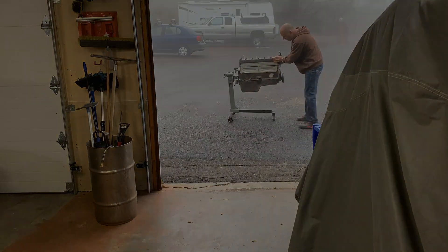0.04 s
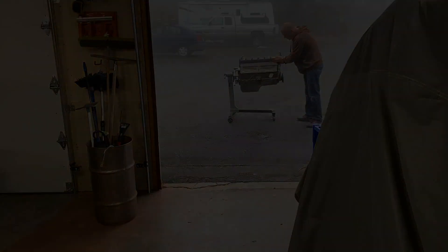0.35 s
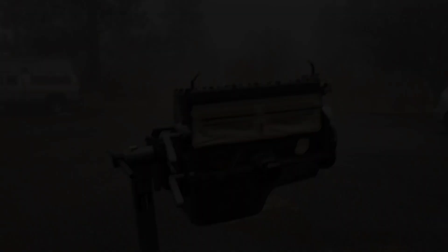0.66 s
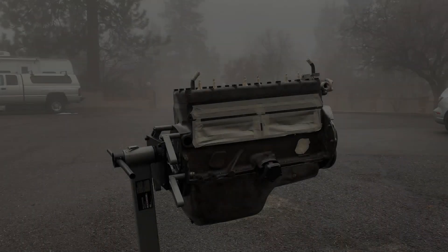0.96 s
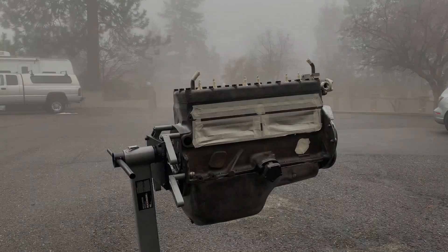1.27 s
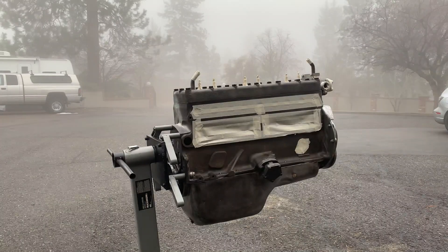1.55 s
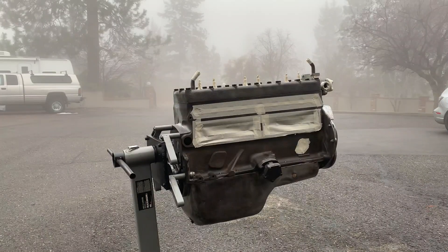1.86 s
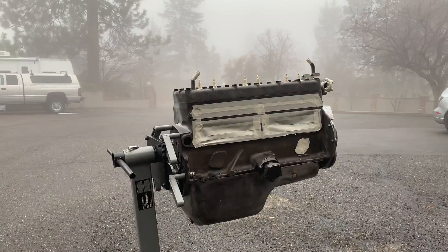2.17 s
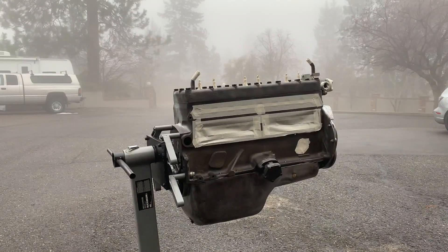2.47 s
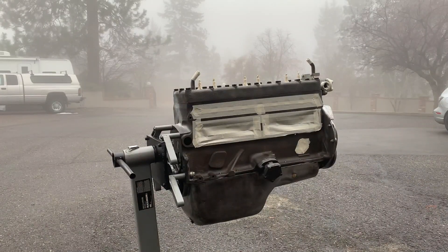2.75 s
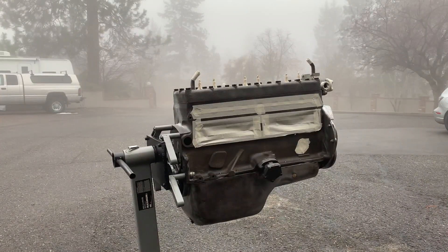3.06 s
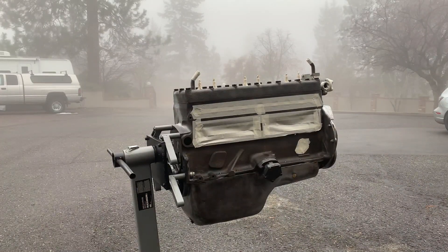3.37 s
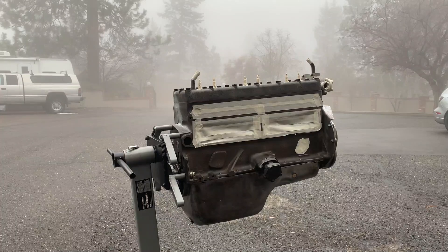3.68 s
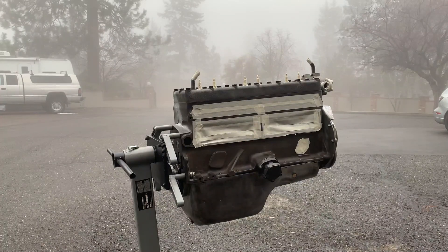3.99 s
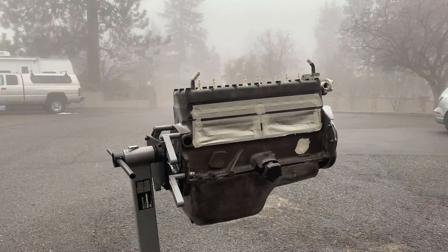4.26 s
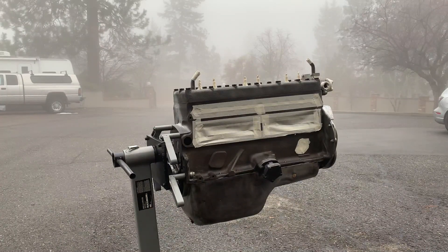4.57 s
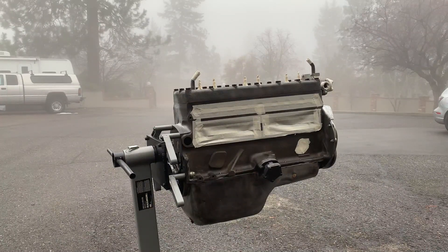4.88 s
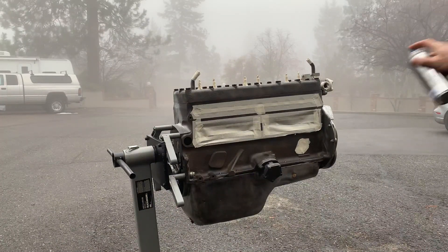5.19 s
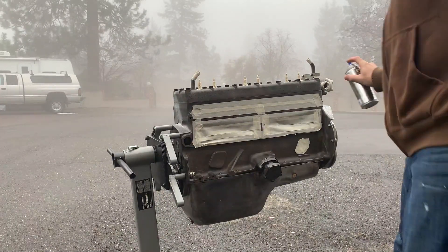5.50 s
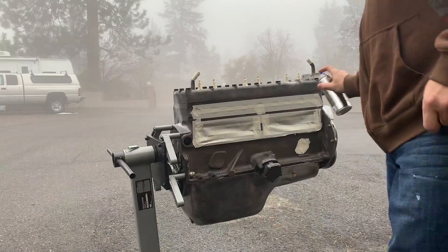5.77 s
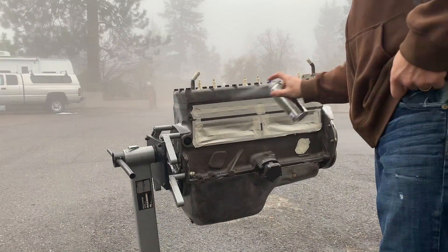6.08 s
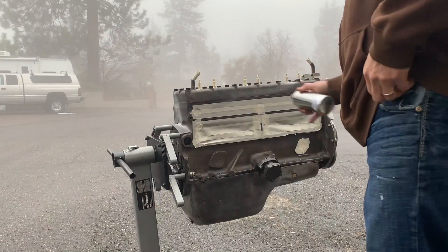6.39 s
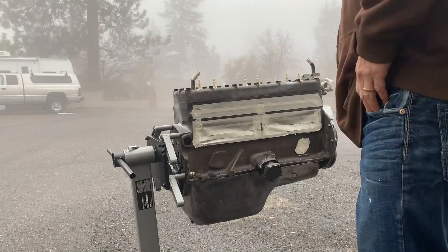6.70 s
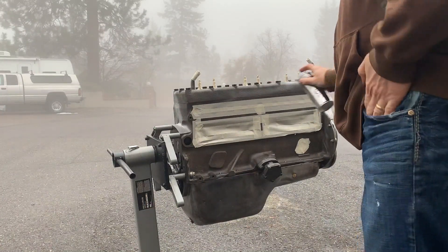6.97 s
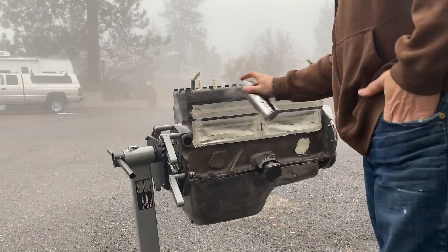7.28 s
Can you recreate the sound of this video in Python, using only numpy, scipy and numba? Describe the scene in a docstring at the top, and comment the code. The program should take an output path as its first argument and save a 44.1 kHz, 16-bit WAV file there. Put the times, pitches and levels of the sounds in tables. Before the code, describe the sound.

At the start, a loaded engine stand clatters over asphalt, heard from inside a garage: casters knock and the steel frame rings, fading to silence by about 0.6 seconds. From 0.7 seconds an outdoor scene fades in with a faint low rumble. From about 1 second a spray paint can is shaken to the right, its ball clacking sharply on the thin metal walls while the paint sloshes softly. The rattle is loudest and busiest between 2.3 and 3.9 seconds, then thins to a few weak taps. Between 5 and 5.6 seconds the can, now in front, gives several more clacks and a small slosh. Soft shoe thuds come now and then. A bright spray hiss runs from 5.7 to 6.3 seconds, followed by a couple of faint ticks. A second burst starts at 6.8 seconds and swells until the end, around 7.5 seconds.

```python
"""An aerosol can is shaken outdoors, to the right: its ball clacks on the thin walls, its paint sloshes.
Carried to the front, it sprays two long bursts of turbulent hiss, each building up.
Before that, a loaded engine stand clatters over asphalt, heard from a garage: casters knock, steel rings.
The stand fades out and the outdoor scene fades in, with soft shoe thuds and a low rumble behind the can."""
import sys
import numpy as np
from scipy import signal
from scipy.fft import rfft, irfft
from scipy.io import wavfile
from scipy.ndimage import map_coordinates
from numba import njit

SR = 44100
rng = np.random.default_rng(int(sys.argv[2]) if len(sys.argv) > 2 else 0)


def file_out(sig):
    """Save sig as 16-bit WAV at sys.argv[1]."""
    # one column per channel
    cols = np.atleast_2d(sig).T
    # limit, then scale
    lim = np.clip(cols, -1, 1)
    pcm = np.round(lim * 32767).astype(np.int16)
    wavfile.write(sys.argv[1], SR, pcm)


N = 328104
TIME_S = np.arange(N) / SR

# Ball hits on the can wall (main strikes, off-beat taps, strong rebounds), each followed by small bounces:
# (time [s], relative level [dB], spot ring [Hz], tilt [dB/octave], hollow knock [dB],
# first flight [s], relative level of first bounce [dB])
BALL_HITS = [(0.982, -37.5, 1725, -1, -17.5, 0.039, -41), (1.1994, -42, 2200, -2.5, -17.5, 0.018, -42.5),
             (1.264, -32, 3420, -2, -13, 0.03, -31.5), (1.335, -30.5, 2180, -2, -20, 0.0025, -54),
             (1.4431, -22, 2900, -3, -10.5, 0.018, -26.5), (1.4925, -20, 1395, -4.5, -4.5, 0.013, -27),
             (1.541, -20.5, 1687, -4, -14.5, 0.023, -30), (1.553, -20, 5000, 2.5, -19, 0.026, -30),
             (1.568, -21.5, 3000, -8.5, -15, 0.017, -29.5), (1.645, -38.5, 2000, -4, -5.5, 0.0033, -38),
             (1.95, -22.5, 3900, 2, -0.5, 0.004, -26.5), (2.0139, -25, 1480, -5, -10.5, 0.01, -25.5),
             (2.078, -21.5, 2150, 0, -8, 0.017, -26.5), (2.1164, -29, 1960, 4.5, -1.5, 0.015, -29.5),
             (2.2849, -16.5, 3660, -2, -18, 0.004, -15.5), (2.3429, -28.5, 5100, -1, -19.5, 0.025, -35.5),
             (2.3847, -16, 3840, -2.5, -11, 0.042, -31.5), (2.4659, -10, 3400, 1, -24.5, 0.005, -30),
             (2.4826, -11.5, 4600, 3.5, -21, 0.0048, -24.5), (2.519, -16, 6100, 0, -21.5, 0.038, -28),
             (2.6082, -23, 1800, 4, -0.5, 0.042, -21.5), (2.6131, -13, 4400, -3, -14, 0.04, -29),
             (2.6898, -12.5, 3320, 1, -19.5, 0.0079, -31), (2.7019, -11.5, 3940, 3.5, -24.5, 0.0062, -26.5),
             (2.7124, -15.5, 3930, 4.5, -21.5, 0.013, -27), (2.8207, -13, 6000, -1, -19.5, 0.018, -22.5),
             (2.9071, -15.5, 2000, 1.5, -16, 0.0061, -15), (3.0018, -11, 2400, 0.5, -12, 0.021, -17.5),
             (3.112, -14, 2240, 0.5, -16.5, 0.019, -16.5), (3.1336, -15.5, 2500, 2, -14.5, 0.011, -29),
             (3.183, -8, 4000, -1.5, -10, 0.038, -30.5), (3.227, -16.5, 1580, -2, -21, 0.0076, -21.5),
             (3.297, -12.5, 2340, -1, -18, 0.011, -17), (3.3119, -16, 2600, 6.5, -19, 0.0033, -23),
             (3.3342, -18, 6740, 4.5, -17, 0.013, -24), (3.3886, -11, 2180, 2.5, -13.5, 0.051, -25),
             (3.467, -24, 1900, -4.5, -14.5, 0.01, -41.5), (3.5131, -11, 3060, 1, -22.5, 0.033, -21.5),
             (3.566, -25.5, 2190, 5.5, -17, .0135, -30), (3.6337, -13, 2320, .5, -19, 0.022, -23.5),
             (3.737, -27.5, 1870, -3, -9.5, 0.0041, -36), (3.7601, -16.5, 2340, 3, -20, 0.0065, -15.5),
             (3.882, -17.5, 2100, -0.5, -9.5, 0.0048, -31), (3.918, -32, 2470, 1.5, 0, 0.046, -45),
             (4.052, -35, 2310, 2.5, 5, 0.03, -38), (4.2085, -33.5, 2950, -7.5, -14, 0.077, -45),
             (4.3509, -43.5, 2600, -3.5, -13.5, 0.098, -42.5), (4.6768, -45, 2950, -3, -16.5, 0.038, -58),
             (5.0627, -16.5, 3420, -2, -18.5, 0.013, -17), (5.1134, -29.5, 1630, -1, -9.5, 0.038, -30),
             (5.1934, -27, 2185, 1.5, 4, 0.0041, -20.5), (5.334, -38.5, 1710, 1, -1, 0.0075, -60),
             (5.404, -22.5, 5000, 3.5, -8.5, 0.066, -42), (5.5172, -34.5, 1700, -0.5, -3, 0.0043, -34.5),
             (5.5816, -32.5, 1800, -0.5, -3.5, 0.041, -36.5), (6.442, -42, 2130, -2, -14, 0.053, -39.5),
             (6.691, -47.5, 2500, 2, -15, 0.052, -54)]
# Clack spectrum: (frequency [Hz], level [dB])
CLACK_SPECTRUM = [(200, -27.5), (550, -20.5), (900, -8.5), (1600, 1.5), (2600, -2.5), (3900, 1),
                  (6300, -3.5), (8000, -8.5), (10000, -10), (15000, -19)]
# Can wall modes: (frequency [Hz], level [dB], t60 [s])
WALL_MODES = [(1697, -3, 0.072), (2380, -15, 0.043), (2340, 16.5, 0.019), (2563, -6, 0.09),
              (3260, -29, .03), (3600, 2, 0.039), (4350, 9.5, 0.012), (4824, 16.5, 0.012), (4700, 3, 0.031),
              (5950, -9, 0.0069), (8100, -18, .02)]
# Whole-can flex on a square hit: (frequency [Hz], level [dB], t60 [s])
FLEX_MODES = [(433, -18, 0.011), (860, 0.5, 0.012), (1150, -5.5, 0.015), (1368, 4, 0.0096)]
# Ball skids: (time [s], level [dB], centre [Hz], length [s], top treble [dB])
BALL_SKIDS = [(1.78, -46.5, 6160, 0.04, -33.5), (2.133, -47, 4430, 0.051, -51),
              (2.283, -23.5, 3590, 0.012, -40.5), (2.376, -37.5, 3850, .012, -26),
              (2.909, -30, 2820, 0.028, -18.5), (3.114, -22.5, 3180, 0.015, -10),
              (3.305, -23.5, 2776, 0.04, -8.5), (5.063, -25, 3170, 0.019, -44),
              (5.175, -51, 2487, 0.0191, -37)]
# Sloshing paint spectrum: (frequency [Hz], level [dB])
SLOSH_SPECTRUM = [(250, -4.5), (550, -5), (1000, 0.5), (1800, 5), (2800, -10.5), (3800, 1.5), (5000, -9),
                  (6800, -6.5), (9000, -18), (15000, -20)]
# Paint swirl strength: (time [s], relative level [dB])
SWIRL_LEVELS = [(.75, -91), (1.38, -81.5), (1.58, -45.5), (1.7, -51), (1.8, -43), (1.91, -54.5),
                (2.05, -43.5), (2.24, -57.5), (2.9, -42.5), (3.8, -52.5), (3.93, -55), (4.17, -63),
                (4.5, -63), (4.6, -78), (5.02, -80), (5.55, -50.5), (5.75, -64), (6.8, -65.5)]
# Paint gulps: (time [s], relative level [dB], start pitch [Hz], end pitch [Hz], glide [s])
PAINT_GULPS = [(1.4117, -29.5, 1850, 419, 0.0028), (1.772, -44.5, 1300, 490, 0.0033),
               (1.805, -54, 493, 108, 0.0048), (3.862, -53, 255, 103, .006),
               (3.925, -52.5, 267, 121, 0.0091), (5.384, -43, 620, 272, 0.0055),
               (5.408, -52.5, 330, 140, 0.0066), (5.437, -65, 300, 120, .01)]
# Gas pocket as the paint moves: (time [s], lowest resonance [Hz], ring gain [dB])
POCKET_TRACK = [(1.42, 1050, -3), (1.51, 915, 6), (1.59, 882, 11.5), (1.64, 1155, 15), (1.85, 1074, 5),
                (2.1, 1080, 4), (2.6, 780, -8.5), (3.0, 1080, -8), (3.181, 904, 2), (3.6, 1063, -12),
                (3.9, 900, -4), (5.1, 1093, -5), (5.3, 923, -7), (5.479, 680, 15), (5.65, 1024, 2)]
# Gas pocket modes: (ratio to lowest [-], level [dB])
GAS_MODES = [(1, -0.5), (1.599, -7), (2.9, -19.5)]
# Can colour in front, inverted and halved at the side: (frequency [Hz], gain [dB])
FACING_EQ = [(1000, -6.5), (7000, -4), (11000, 5), (15000, 4)]
# Source at the side: (frequency [Hz], left phase lead [rad])
SIDE_PHASE = [(100, -1.5), (450, -2.5), (1400, -2.5), (2200, -5), (4000, -8.5), (5200, -10), (6500, -13.5),
              (8000, -15.5), (10700, -16), (16000, -24.5)]
# Source in front: (frequency [Hz], left phase lead [rad])
FRONT_PHASE = [(0, 0), (3800, 0), (6200, -1), (7500, -2), (8600, -3.1), (13400, -9.4), (16000, -12.8)]
# Nozzle presses: (start [s], end [s], full flow [dB], initial shortfall [dB], build-up [s], whistle [dB])
PRESSES = [(5.7, 5.75, -54, -3, 0.02, -75), (5.75, 6.303, -44.5, -4, 0.06, -62),
           (6.832, 7.6, -44, -10.5, 0.26, -60)]
# Jet spectrum: (frequency [Hz], level [dB])
JET_SPECTRUM = [(300, -24), (1200, -21.5), (2300, -13), (3000, -8.5), (4900, -5), (5900, -7.5), (7300, -.5),
                (10500, -1), (13000, -1.5), (15500, -1)]
# Jet swept over the engine block: (time [s], bounce delay [s], jet gain [dB])
JET_SWEEP = [(5.7, 0.002, -2), (5.85, 0.0019, 0.5), (5.97, 0.0017, 0), (6.12, 0.0015, 0),
             (6.28, 0.0013, 0.5), (6.83, 0.0019, -0.5), (7.1, .0017, -0.5), (7.44, 0.0013, 0)]
# Nozzle resonances: (frequency [Hz], width [Hz], level re flow [dB])
NOZZLE_MODES = [(4050, 300, -23), (2950, 300, -23), (4900, 350, -24), (7200, 450, -17), (11200, 500, -19)]
# Rolling stand spectrum: (frequency [Hz], level [dB])
STAND_SPECTRUM = [(25, -22), (48, 4.5), (85, -13.5), (140, -7), (240, 1), (400, -2.5), (580, -2),
                  (1060, -2), (1900, -7.5), (2700, -14), (3800, -7), (5400, -20), (7500, -15.5),
                  (15000, -25)]
# Steel frame modes: (frequency [Hz], level [dB], t60 [s])
FRAME_MODES = [(328, -1, .2), (405, -10, .16), (470, -7, .12), (742, -8, .1), (1032, -1, .08),
               (1084, 0, .1), (1369, -6, .12), (1550, -5, .08), (1750, -4, .07), (1890, -1, .1),
               (1975, -1, .2), (2120, -4, .06), (2420, -5, .08), (2900, -6, .06), (3140, -5, .08),
               (3460, -6, .08), (4200, -7, .06)]
# Caster drops into cracks: (time [s], relative level [dB])
CASTER_JOLTS = [(0.008, -26), (0.143, -43.5), (0.204, -30.5)]
# Shoe and cloth thuds: (time [s], relative level [dB], centre [Hz], length [s])
SHOE_THUDS = [(1.813, -56.5, 126, 0.031), (3.377, -65, 260, 0.32), (3.953, -47.5, 360, 0.0097),
              (3.983, -51.5, 330, 0.023), (4.699, -60, 482, 0.015), (4.762, -56, 300, 0.014),
              (5.46, -50, 605, 0.011), (5.865, -49.5, 643, 0.019), (5.917, -52, 500, 0.013),
              (6.687, -58.5, 79, 0.044)]
# Outdoor rumble spectrum: (frequency [Hz], level [dB])
RUMBLE_SPECTRUM = [(22, -30.5), (35, -23), (52, 0), (100, -4), (170, -11), (280, -22.5), (600, -21.5),
                   (1400, -33.5), (4000, -42.5), (8000, -48), (15000, -45)]

CARRY_START_S, CARRY_LENGTH_S = 4.655, 0.53
VALVE_OPEN_S, VALVE_SHUT_S = 0.015, 0.007
FADE_OUT_END_S, FADE_IN_START_S, FADE_IN_END_S = 0.59, 0.72, 2


def shaken_can(ground_delay_s=0.0052, ground_db=-12, heave=0.087, yard_db=-14):
    """Ball and paint, with ground bounce and yard echo; the can moves from side to front."""
    can = clacks() + skids() + ticks() + spatter() + slosh()
    can = can + gas_pocket(can) + gulps()
    bounce_s = ground_delay_s * (1 + heave * walk(8))
    can = can + undb(ground_db) * delayed(can, bounce_s)
    front = np.clip((TIME_S - CARRY_START_S) / CARRY_LENGTH_S, 0, 1)
    at_side = shape(can * (1 - front), [(hz, -db / 2) for hz, db in FACING_EQ])
    in_front = shape(can * front, FACING_EQ)
    direct = place(at_side, SIDE_PHASE, left_db=-2.5) + place(in_front, FRONT_PHASE, left_db=-3)
    return swing(direct, 1 - front) + undb(yard_db) * echo(can, t60_s=0.19, top_hz=5400)


def clacks(restitution=0.45, loss_db=-11.5, wander_octaves=0.43, bounces=4, gain_db=-1):
    """After each listed hit the ball bounces in ever shorter, weaker hops onto nearby spots."""
    out = np.zeros(N)
    for at_s, db, spot_hz, tilt_db, knock_db, flight_s, bounce_db in BALL_HITS:
        hit = clack(spot_hz, tilt_db, knock_db)
        start_s = at_s - len(hit) / 2 / SR
        add(out, start_s, undb(db) * hit)
        for hop, wander in enumerate(rng.standard_normal(bounces)):
            start_s += flight_s * restitution ** hop
            bounce = clack(spot_hz * 2 ** (wander_octaves * wander), tilt_db, knock_db + loss_db)
            add(out, start_s, undb(bounce_db + hop * loss_db) * bounce)
    return out * undb(gain_db)


def clack(spot_hz, tilt_db, knock_db, spot_db=7, spot_octaves=0.28, rush_rise_s=0.0028, size=2048):
    """The ball rushes through paint, then hits the paint-damped wall at the array's centre."""
    t, hz = np.arange(size) / SR, np.fft.rfftfreq(size, 1 / SR)
    peak_db = spot_db * np.exp(-0.5 * (np.log2((hz + 1) / spot_hz) / spot_octaves) ** 2)
    slope_db = tilt_db * np.log2(np.clip(hz, 900, 8500) / 3000)
    snap = unit(impulse(colour_db(CLACK_SPECTRUM, hz) + peak_db + slope_db + 2 * ripple_db(hz)))
    fine_ticks = rng.standard_normal(size) ** 3 * decay(t, t60_s=0.009)
    shudder = unit(signal.fftconvolve(snap, fine_ticks)[:size])
    splash = unit(shape(rng.standard_normal(size) ** 3, CLACK_SPECTRUM) * decay(t, t60_s=0.033))
    # Moving paint loads the wall differently at each hit.
    wall = unit(ring(WALL_MODES, t, spread_db=5, detune=0.05))
    knock = unit(ring(FLEX_MODES, t, spread_db=2, detune=0.05))
    hit = snap + undb(knock_db) * knock + undb(-4) * shudder + undb(-22) * splash + undb(-18) * wall
    rush = unit(shape(rng.standard_normal(size), CLACK_SPECTRUM) * np.exp(-t[::-1] / rush_rise_s))
    scale = np.sqrt(0.00097 * SR / size)  # snap energy = about 1 ms at unit level
    return np.concatenate([undb(-16.5) * rush, hit]) * scale


def skids(bounce_hz=230, skirt_db=-15):
    """The ball chatters along the wall in fast bounces."""
    out = np.zeros(N)
    for at_s, db, hz, length_s, top_db in BALL_SKIDS:
        t = np.arange(int(length_s * SR)) / SR
        bounces = rng.standard_normal(len(t)) * np.exp(-4 * (t * bounce_hz % 1))
        spectrum = [(200, -35), (hz / 3, skirt_db), (hz, 0), (hz * 2, top_db / 2), (16000, top_db)]
        chatter = unit(shape(bounces, spectrum))
        add(out, at_s, undb(db) * chatter * signal.windows.tukey(len(t), 0.5))
    return out


def ticks(gain_db=-12):
    """The loose ball taps the wall as hard as the paint swirls, until the can is carried."""
    spectrum = [(500, -10.5), (1500, -2), (4000, 1), (7000, -2.5), (15000, -19.5)]
    taps = unit(shape(grains(rate_hz=450, spread_db=3), spectrum))
    return taps * gain_curve(SWIRL_LEVELS) * undb(gain_db) * (TIME_S < CARRY_START_S)


def spatter(gain_db=-36, lag_s=0.0096):
    """Each listed hit throws paint drops at the wall: a bright, dying crackle."""
    spectrum = [(500, -14), (2000, -6), (6000, -6.5), (10000, 2.5), (15000, 2)]
    drops = unit(shape(grains(rate_hz=600, spread_db=3.5), spectrum))
    return drops * sum(undb(db + gain_db) * surge(at_s + lag_s, rise_s=0.00371, fall_s=0.035)
                       for at_s, db, *_ in BALL_HITS)


def slosh(wave_db=-47, wave_db_per_db=0.22, gain_db=-2):
    """Paint fizzes as it swirls; a wave arrives with each listed hit."""
    fizz = shape(grains(rate_hz=3000, spread_db=2), SLOSH_SPECTRUM)
    fizz = shimmer(fizz, depth_db=4.5, rate_hz=40)
    waves = sum(undb(wave_db + wave_db_per_db * db) * surge(at_s, rise_s=0.0074, fall_s=0.03)
                for at_s, db, *_ in BALL_HITS)
    return fizz * np.hypot(gain_curve(SWIRL_LEVELS), waves) * undb(gain_db)


def gas_pocket(drive, q=24.0, wobble_octaves=0.058):
    """Gas above the paint rings; the pitch glides as the pocket changes shape."""
    at_s, lowest_hz, ring_db = np.transpose(POCKET_TRACK)
    pitch_hz = np.interp(TIME_S, at_s, lowest_hz) * 2 ** (wobble_octaves * walk(25))
    rings = sum(undb(db) * bandpass(drive, pitch_hz * ratio, q) for ratio, db in GAS_MODES)
    return rings * undb(np.interp(TIME_S, at_s, ring_db))


def gulps(peak_cycles=2.28, froth_db=-7):
    """Gas opens a pocket in the paint: a few cycles of frothy, falling tone."""
    out, t = np.zeros(N), np.arange(SR // 8) / SR
    for at_s, db, start_hz, end_hz, glide_s in PAINT_GULPS:
        hz = end_hz + (start_hz - end_hz) * np.exp(-t / glide_s)
        cycles = np.cumsum(hz) / SR
        tone = 2 * np.sin(2 * np.pi * cycles)
        swell = cycles / peak_cycles * np.exp(1 - cycles / peak_cycles)
        spectrum = [(end_hz / 2.5, -10.5), (end_hz, 0), (start_hz, -2), (start_hz * 1.7, -24), (15000, -55)]
        froth = unit(shape(rng.standard_normal(len(t)), spectrum))
        add(out, at_s, undb(db) * (tone + undb(froth_db) * froth) * swell)
    return out


def swing(pair, depth, lag_s=0.00008):
    """The can swings in the hand, so the left-right lag wavers."""
    shift_s = lag_s * depth * walk(10) / 2
    return np.array([map_coordinates(x, [(TIME_S + sign * shift_s) * SR], order=3)
                     for x, sign in zip(pair, (1, -1))])


def spray(flutter_db=1, yard_db=-12, gain_db=-2):
    """Turbulent jet of gas and droplets; its bounce off the engine block sweeps a comb through it."""
    at_s, delay_s, sweep_db = np.transpose(JET_SWEEP)
    hiss = shape(rng.standard_normal(N), JET_SPECTRUM)
    hiss = shimmer(hiss, depth_db=2, rate_hz=9, bands_per_octave=5)
    jet = hiss * flow() * undb(flutter_db * walk(40) + np.interp(TIME_S, at_s, sweep_db) + gain_db)
    late = delayed(jet, np.interp(TIME_S, at_s, delay_s))
    bounce = shape(late, [(1000, -8), (4000, -4), (7000, -6), (11000, -9)])
    direct = place(jet + bounce, FRONT_PHASE, left_db=-0.3)
    return direct + undb(yard_db) * echo(jet, t60_s=0.3, top_hz=3540)


def nozzle_whistle(waver_db=3.5):
    """Nozzle resonances follow the flow; the first listed whistles as each press begins."""
    steady = sum(hiss_band(hz, width_hz) * undb(db + waver_db * walk(8))
                 for hz, width_hz, db in NOZZLE_MODES)
    onsets = sum(undb(db) * valve(start_s, end_s) * surge(start_s, VALVE_OPEN_S, fall_s=0.09)
                 for start_s, end_s, *_, db in PRESSES)
    whistle = hiss_band(*NOZZLE_MODES[0][:2]) * onsets
    return place(steady * flow() + whistle, FRONT_PHASE, left_db=-0.5)


def flow():
    """Jet strength, building up with each press."""
    out = np.zeros(N)
    for start_s, end_s, full_db, shortfall_db, build_s, _ in PRESSES:
        age_s = np.maximum(TIME_S - start_s, 0)
        out += valve(start_s, end_s) * undb(full_db + shortfall_db * np.exp(-age_s / build_s))
    return out


def valve(start_s, end_s):
    """Valve opening over one press, 0-1."""
    opening = np.clip((TIME_S - start_s) / VALVE_OPEN_S, 0, 1)
    return opening * np.exp(-np.maximum(TIME_S - end_s, 0) / VALVE_SHUT_S)


def engine_stand(roll_db=-32.5, slowing_db_per_s=-67, jolt_t60_s=0.11, garage_db=-3, gain_db=-2):
    """Hard casters knock over stones as the stand slows; the steel frame rings, the garage echoes."""
    knocks = grains(rate_hz=1200, spread_db=1)
    jolts = sum(undb(db) * surge(at_s, rise_s=0.0058, fall_s=jolt_t60_s / np.log(1000))
                for at_s, db in CASTER_JOLTS)
    force = (undb(roll_db + slowing_db_per_s * TIME_S) + jolts) * (TIME_S < FADE_OUT_END_S)
    modes = ring(FRAME_MODES, np.arange(SR // 3) / SR, spread_db=0, detune=0)
    frame = signal.fftconvolve(knocks * force, modes / np.linalg.norm(modes))[:N]
    rolling = unit(shape(knocks, STAND_SPECTRUM)) * force
    direct = undb(-3) * (rolling + frame)
    return (direct + undb(garage_db) * echo(direct, t60_s=0.19, top_hz=9100)) * undb(gain_db)


def shoe_thuds(skirt_db=-20, yard_db=-5):
    """Soft soles and cloth to the right: dull bumps that swell and die."""
    out, t = np.zeros(N), np.arange(SR // 2) / SR
    for at_s, db, hz, length_s in SHOE_THUDS:
        spectrum = [(hz / 6, skirt_db), (hz / 2, 0), (hz * 1.3, 0), (hz * 4, skirt_db), (16000, -55)]
        bump = unit(shape(rng.standard_normal(len(t)), spectrum))
        age = 2 * t / length_s
        add(out, at_s, undb(db) * bump * age * np.exp(1 - age))
    direct = out * undb([[-2], [2]])
    return direct + undb(yard_db) * echo(out, t60_s=0.31, top_hz=2910)


def outdoor_rumble(level_db=-60.5, side_db=-6, left_db=-2.5):
    """Low noise whose bands swell and sink, mostly alike left and right."""
    mid = shape(rng.standard_normal(N), RUMBLE_SPECTRUM)
    mid = shimmer(mid, depth_db=1.8, rate_hz=9, bands_per_octave=1, lowest_hz=16)
    side = unit(shape(rng.standard_normal(N), RUMBLE_SPECTRUM))
    sign = np.array([[1], [-1]])
    return (mid + undb(side_db) * side * sign) * undb(level_db + sign * left_db / 2)


def fade(entry_gain=0.13):
    """The garage fades to silence; the outdoors cuts in low and rises to full."""
    fade_out = np.clip(1 - TIME_S / FADE_OUT_END_S, 0, 1)
    fade_in = np.interp(TIME_S, [FADE_IN_START_S, FADE_IN_END_S], [entry_gain, 1], left=0)
    return fade_out + fade_in


def place(x, phases, left_db):
    """Mono to stereo by left-right phase and level."""
    lead_rad = np.interp(np.fft.rfftfreq(N, 1 / SR), *np.transpose(phases))
    left = np.exp(0.5j * lead_rad) * undb(left_db / 2)
    return irfft(rfft(x) * np.array([left, 1 / left]), N)


def echo(x, t60_s, top_hz):
    """Diffuse reflections, unrelated left and right."""
    t = np.arange(SR // 2) / SR
    tail = rng.standard_normal((2, len(t))) * decay(t, t60_s) * (1 - np.exp(-t / 0.00018))
    tail = signal.lfilter(*signal.butter(1, top_hz, fs=SR), tail)
    return signal.fftconvolve(x[None], unit(tail) / np.sqrt(len(t)), axes=1)[:, :N]


def ring(modes, t, spread_db, detune):
    """Decaying modes with random strength, detuning and phase."""
    hz, db, t60_s = np.transpose(modes)[:, :, None]
    size = undb(db + spread_db * rng.standard_normal(hz.shape))
    hz = hz * (1 + detune * rng.standard_normal(hz.shape))
    return np.sum(size * decay(t, t60_s) * np.sin(2 * np.pi * (hz * t + rng.random(hz.shape))), axis=0)


def hiss_band(hz, width_hz, drift=0.018):
    """Narrow noise band with a drifting centre."""
    lowpass = signal.butter(2, width_hz / 2, fs=SR, output="sos")
    wobble = unit(signal.sosfilt(lowpass, rng.standard_normal(N)))
    centre_hz = hz * (1 + drift * walk(5))
    return unit(wobble * np.sin(2 * np.pi * np.cumsum(centre_hz) / SR))


@njit
def bandpass(x, hz, q):
    """Moving resonance, gain 1 at the centre."""
    y, band_state, low_state = np.empty(len(x)), 0., 0.
    for i in range(len(x)):
        g = np.tan(np.pi * hz[i] / SR)
        band = (band_state + g * (x[i] - low_state)) / (1 + g * (g + 1 / q))
        band_state = 2 * band - band_state
        low_state += 2 * g * band
        y[i] = band / q
    return y


def shimmer(x, depth_db, rate_hz, bands_per_octave=3, lowest_hz=128):
    """Each band swells and sinks on its own; unit RMS."""
    spectrum, octave = rfft(x), np.log2(np.fft.rfftfreq(N, 1 / SR) + 1)
    out = np.zeros(N)
    for centre in np.arange(np.log2(lowest_hz), 14.4, 1 / bands_per_octave):
        band = np.clip(1 - bands_per_octave * np.abs(octave - centre), 0, 1)
        out += irfft(spectrum * band, N) * undb(depth_db * walk(rate_hz))
    return unit(out)


def grains(rate_hz, spread_db):
    """Dense random clicks of uneven size."""
    size = undb(spread_db * np.minimum(rng.exponential(size=N), 4))
    return unit((rng.random(N) < rate_hz / SR) * size * rng.standard_normal(N))


def impulse(db):
    """Minimum-phase pulse with this spectrum."""
    cepstrum = irfft(np.log(undb(db)))
    half = len(cepstrum) // 2
    cepstrum[1:half] *= 2
    cepstrum[half + 1:] = 0
    return irfft(np.exp(rfft(cepstrum)))


def shape(x, spectrum):
    """Filter by (frequency [Hz], gain [dB]) rows."""
    n = x.shape[-1]
    return irfft(rfft(x) * undb(colour_db(spectrum, np.fft.rfftfreq(n, 1 / SR))), n)


def colour_db(spectrum, hz):
    """Spectrum read on a log-frequency axis."""
    at_hz, db = np.transpose(spectrum)
    return np.interp(np.log(hz + 1), np.log(at_hz), db)


def ripple_db(hz, count=40):
    """Random spectral peaks and dips."""
    log_hz = np.linspace(np.log(200), np.log(SR / 2), count)
    return np.interp(np.log(hz + 1), log_hz, rng.standard_normal(count))


def surge(peak_s, rise_s, fall_s):
    """Envelope that grows to 1, then dies."""
    out = np.zeros(N)
    near = slice(*np.searchsorted(TIME_S, [peak_s - 10 * rise_s, peak_s + 10 * fall_s]))
    age_s = TIME_S[near] - peak_s
    out[near] = np.exp(-np.maximum(-age_s / rise_s, age_s / fall_s))
    return out


def walk(rate_hz):
    """Random wander, spread near 1."""
    points = rng.standard_normal(int(N / SR * rate_hz) + 2)
    return np.interp(TIME_S * rate_hz, np.arange(len(points)), points)


def gain_curve(rows):
    """Gain from (time [s], level [dB]) rows."""
    return undb(np.interp(TIME_S, *np.transpose(rows)))


def decay(t, t60_s):
    return np.exp(-np.log(1000) * t / t60_s)


def delayed(x, delay_s):
    return np.interp(TIME_S - delay_s, TIME_S, x)


def add(track, at_s, sound):
    start = max(int(at_s * SR), 0)
    track[start:start + len(sound)] += sound[:N - start]


def undb(db):
    return 10 ** (np.asarray(db) / 20)


def unit(x):
    return x / np.sqrt(np.mean(x ** 2) + 1e-20)


def scene():
    """All sources under the fade, in stereo."""
    mix = engine_stand() + shaken_can() + shoe_thuds() + spray() + nozzle_whistle() + outdoor_rumble()
    return mix * fade()


def record(dry, ceiling=0.95, top_hz=15900):
    """Peak clip, then a steep low-pass."""
    lowpass = signal.ellip(8, 0.1, 60, top_hz, fs=SR, output="sos")
    return signal.sosfiltfilt(lowpass, np.clip(dry, -ceiling, ceiling))


dry = scene()
out = record(dry)
file_out(out)
```